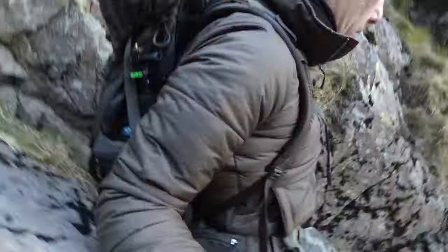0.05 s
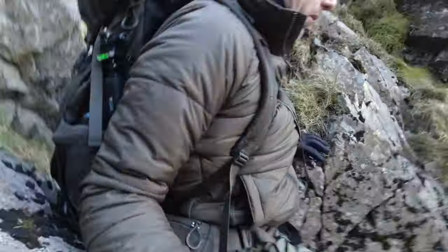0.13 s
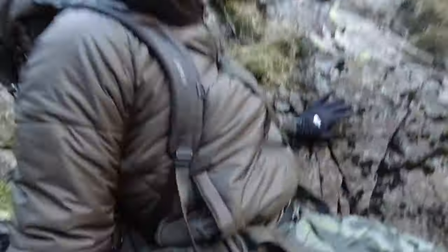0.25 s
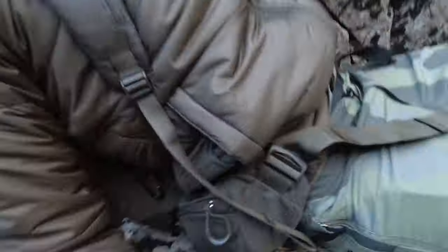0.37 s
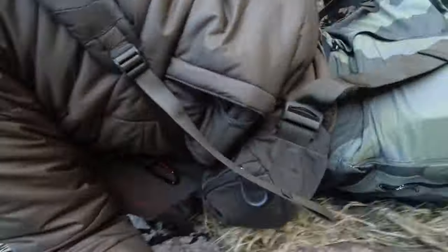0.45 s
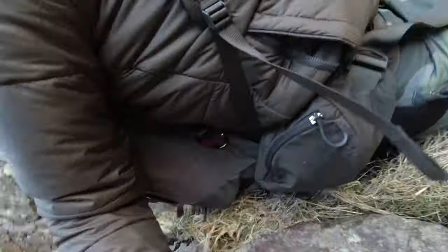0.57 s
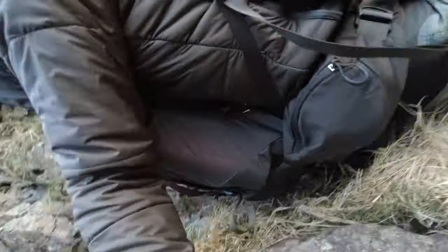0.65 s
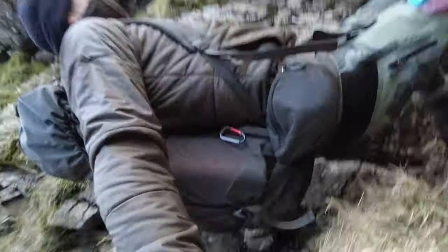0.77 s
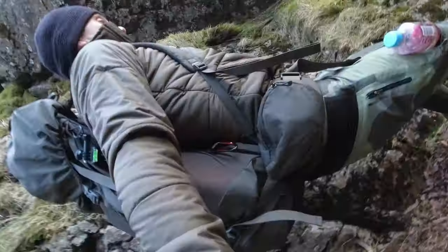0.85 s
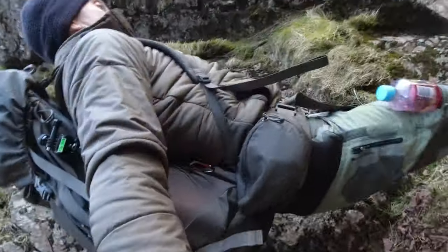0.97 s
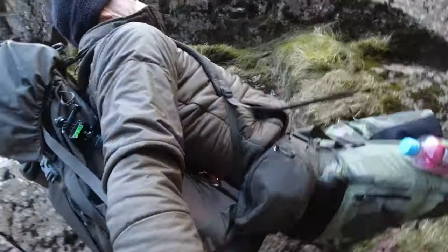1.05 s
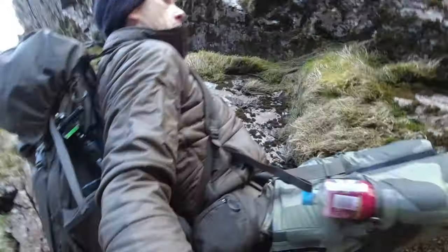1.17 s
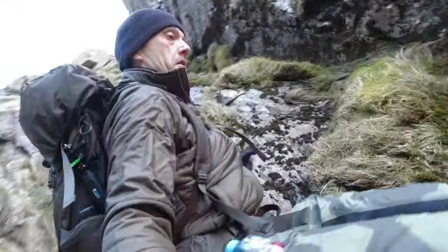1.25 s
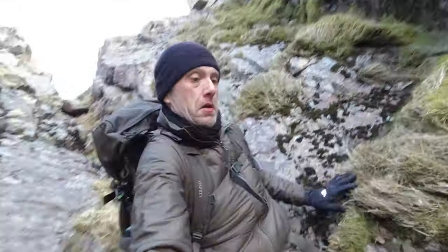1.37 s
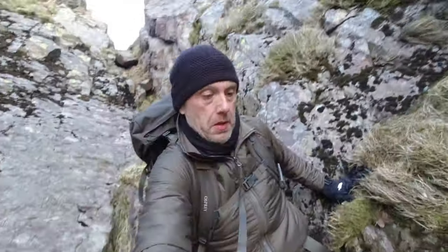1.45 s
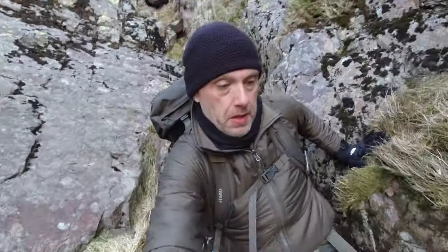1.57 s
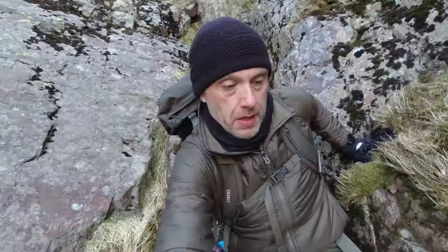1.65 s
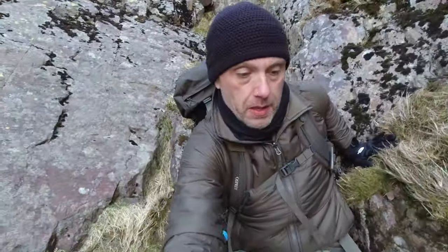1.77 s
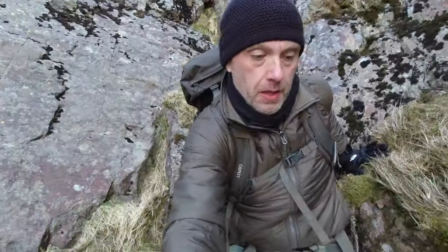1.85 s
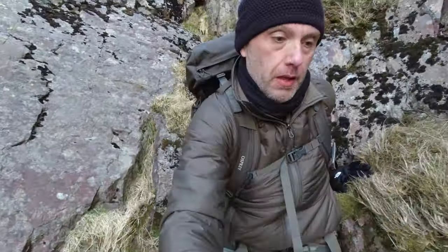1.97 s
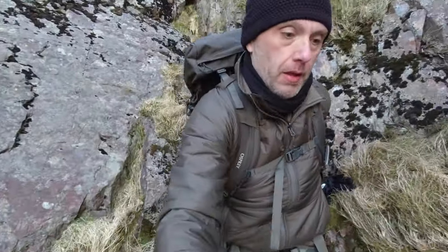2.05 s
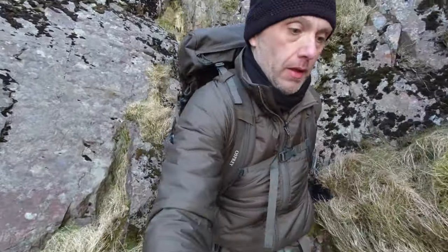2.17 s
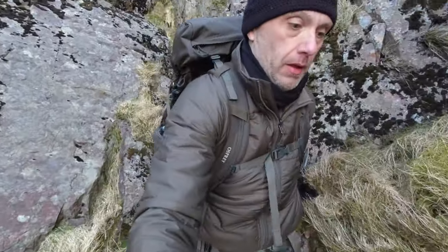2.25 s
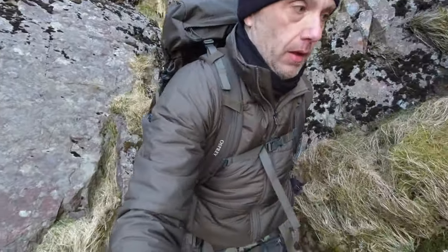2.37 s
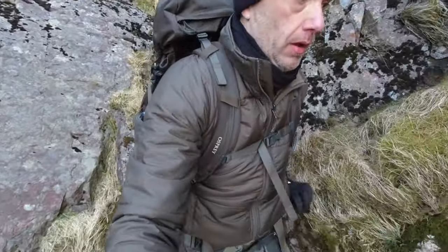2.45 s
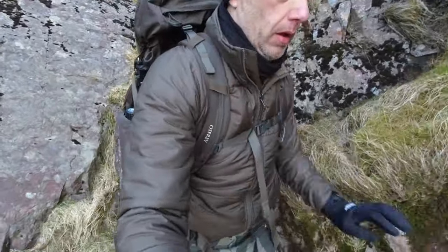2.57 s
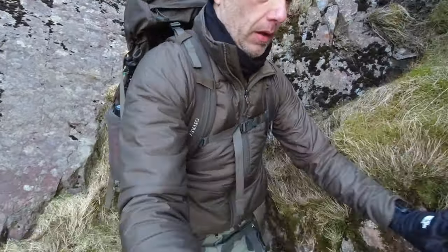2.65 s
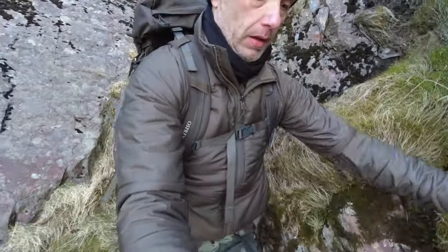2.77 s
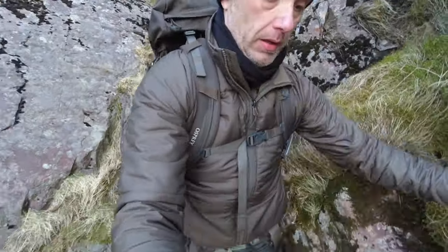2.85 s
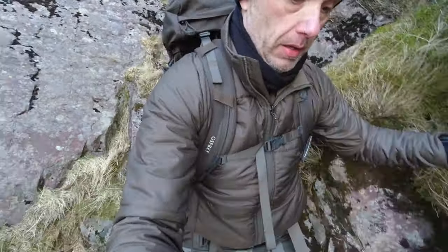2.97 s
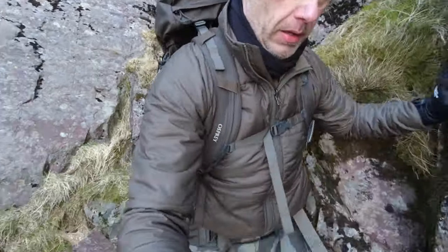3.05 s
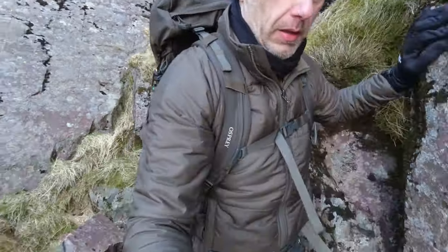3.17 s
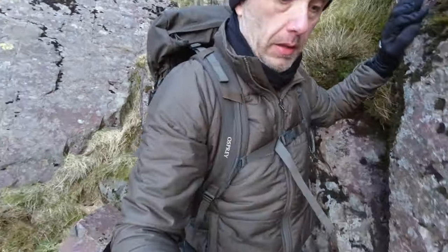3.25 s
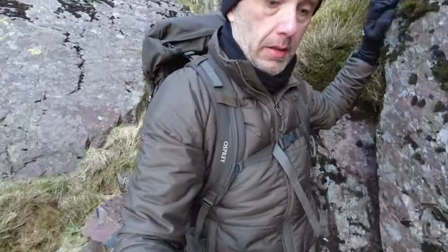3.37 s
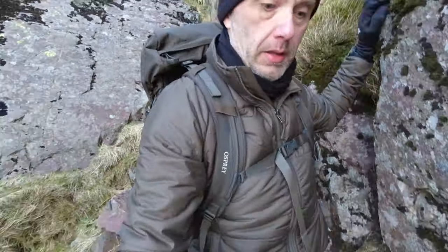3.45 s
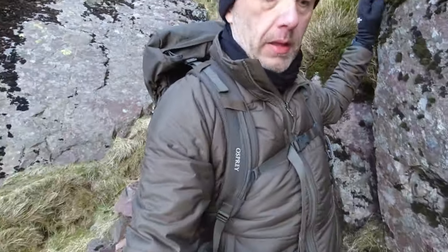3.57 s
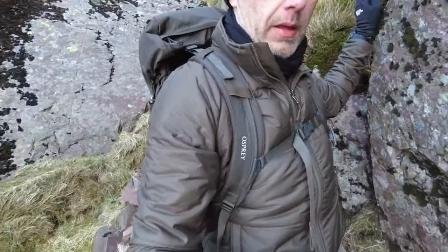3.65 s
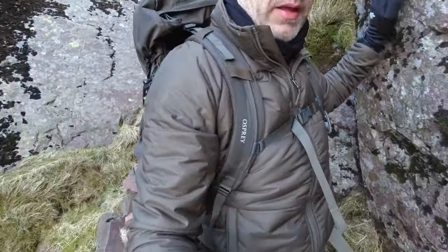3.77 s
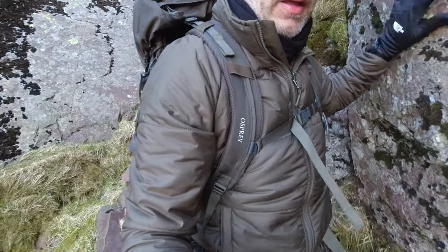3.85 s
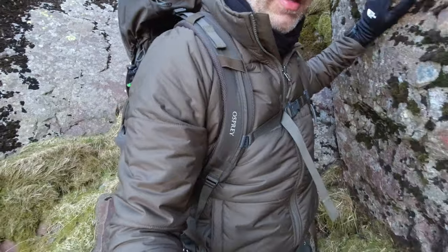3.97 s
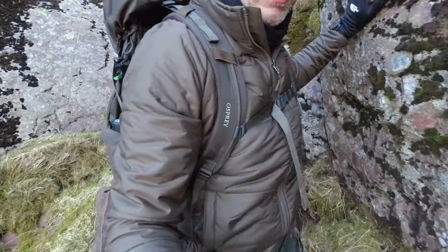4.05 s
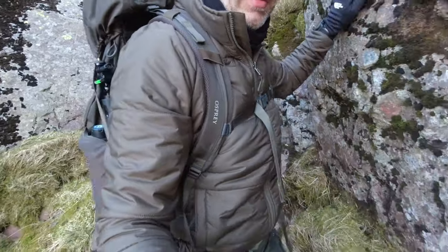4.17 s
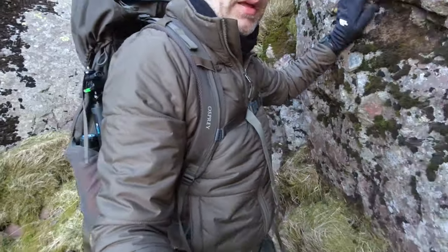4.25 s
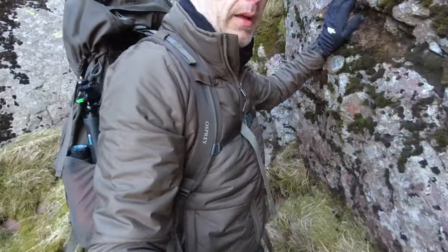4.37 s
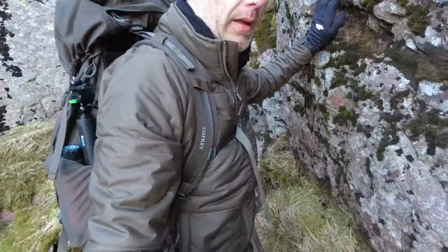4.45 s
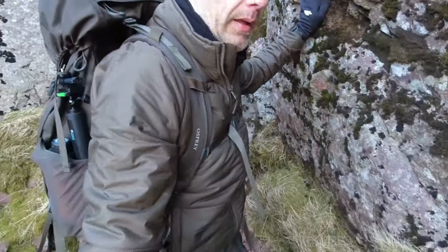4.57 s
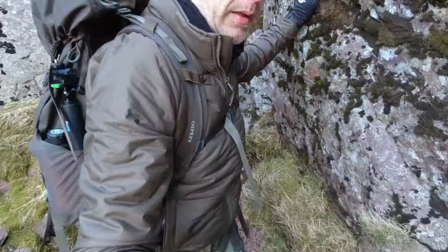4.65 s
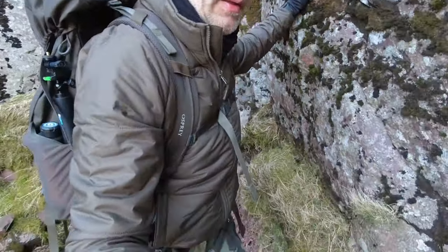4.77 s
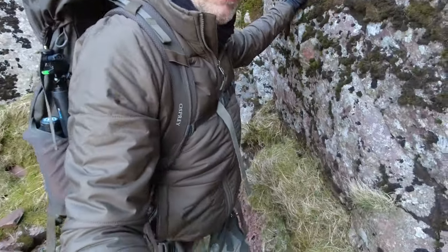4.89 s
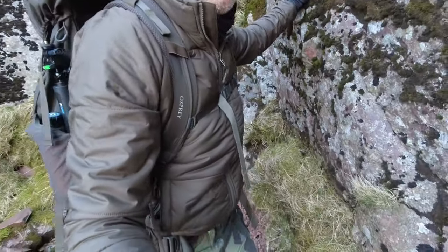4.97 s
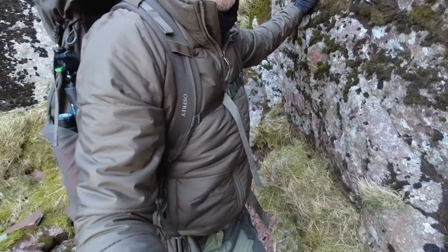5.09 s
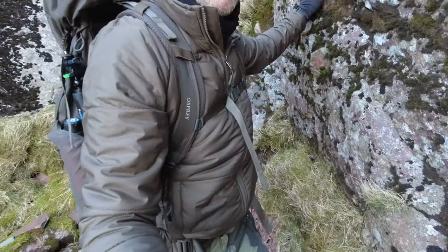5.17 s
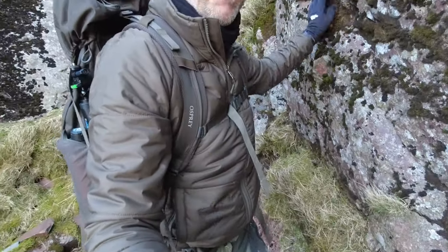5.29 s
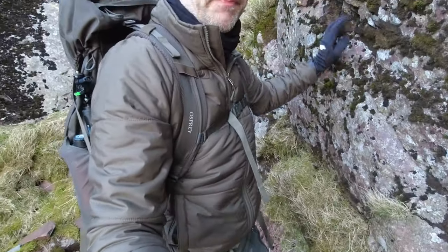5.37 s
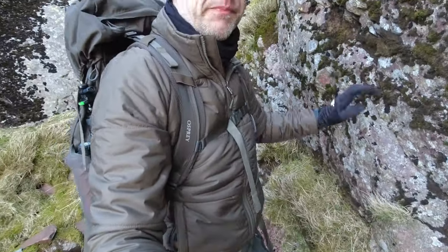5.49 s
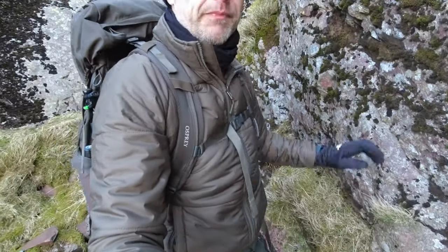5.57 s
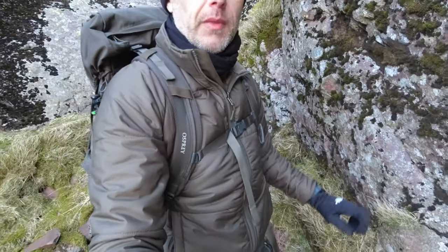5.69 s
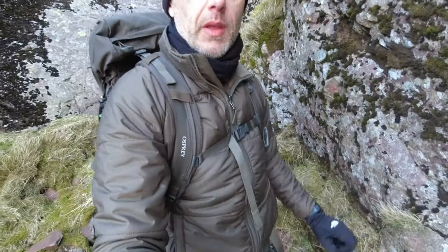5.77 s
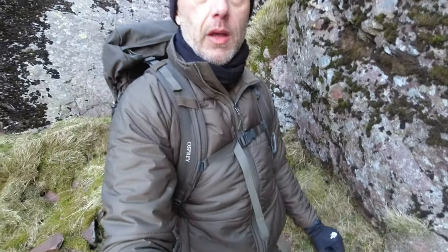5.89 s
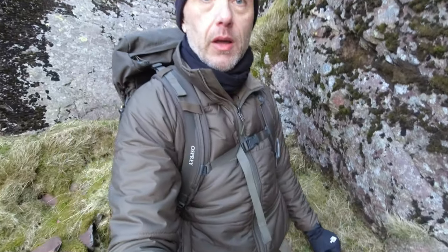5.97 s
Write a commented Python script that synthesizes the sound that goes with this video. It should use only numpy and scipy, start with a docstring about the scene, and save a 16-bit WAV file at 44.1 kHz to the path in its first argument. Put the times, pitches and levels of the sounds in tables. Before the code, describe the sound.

A sharp burst of stone knocks, gritty sliding and nylon rustle, a near-quiet pause, then renewed scraping, boot thuds and cloth swishes that fade.

```python
"""Loose stones knock, grind and clatter under a hiker who slides down a gully and shuffles to a stop.
The stones are ringing modes with noise cracks; sliding is noise chopped into many small contacts.
Boots and pack thud as low rings with noisy scuffs. The nylon jacket, close to the microphones, rustles
as ticking noise and snaps as short bursts. A small hand-held camera hears it all through two ports
in a resonant housing, modelled as a phase lag and a loss of likeness between them."""
import sys
import numpy as np
from scipy import signal
from scipy.fft import rfft, irfft, next_fast_len
from scipy.io import wavfile
from scipy.ndimage import uniform_filter1d

SR = 44100
rng = np.random.default_rng(int(sys.argv[2]) if len(sys.argv) > 2 else 0)


def dump_mix(stems):
    """Bounce the given channels to the path in sys.argv[1] as a 16-bit WAV at rate SR."""
    frames = np.atleast_2d(stems).T  # one column per channel
    limited = np.clip(frames, -1, 1)  # hard clip at full scale
    pcm = np.round(limited * 32767).astype(np.int16)
    wavfile.write(sys.argv[1], SR, pcm)


N = 265790

# The slide underfoot. Each row: time in seconds, deep grind of the body in dB, higher grind of boots in dB,
# clatter of stones in dB, grit in the clatter in dB.
SLIDE_LEVELS = [(0.0, -60, -70, -30, -38), (0.09, -50.5, -61, -47.5, -48), (0.3, -49.5, -53, -38, -53),
                (0.5, -51.5, -58, -39.5, -46.5), (0.57, -50, -47, -35, -53),
                (0.79, -47.5, -45.5, -41, -54.5), (0.92, -37, -38, -40, -45), (0.99, -56, -63, -52.5, -59),
                (1.08, -41, -37, -43.5, -51), (1.36, -49, -56.5, -45.5, -61),
                (1.56, -51.5, -47.5, -48, -57), (1.7, -45.5, -38, -45.5, -52),
                (1.81, -67.5, -61, -57, -55.5), (2.36, -65.5, -73, -63.5, -60),
                (2.46, -55, -61, -54.5, -55), (2.81, -61, -83, -65, -61.5), (2.85, -46, -50, -51.5, -50),
                (2.92, -49, -49.5, -48.5, -55), (3.06, -50, -56.5, -47, -59), (3.14, -30, -36, -36, -41),
                (3.2, -38, -41, -43.5, -45.5), (3.28, -35.5, -43, -41, -45), (3.55, -40, -52, -42, -42.5),
                (3.74, -48, -55, -49.5, -49), (3.82, -41.5, -48, -45.5, -45),
                (4.02, -56, -58, -51.5, -48.5), (4.3, -49.5, -54, -45, -48.5), (4.55, -45, -44, -46, -46),
                (4.62, -51, -46, -41.5, -39.5), (4.8, -45, -54, -41.5, -43),
                (4.92, -57.5, -53.5, -49.5, -39), (5.3, -54, -52.5, -45, -41),
                (5.62, -64.5, -74, -59, -47.5), (6.027, -68, -70, -63, -51.5)]
# Nylon close to the ports. Each row: time in seconds, rustle in dB.
RUSTLE_LEVELS = [(0.0, -67), (0.4, -64), (0.53, -56), (0.72, -65), (0.9, -39.5), (0.99, -52), (1.05, -40.5),
                 (1.23, -43), (1.265, -56), (1.29, -38), (1.4, -51.5), (1.75, -48), (2.3, -54),
                 (2.36, -58.5), (2.46, -50.5), (2.8, -62), (2.845, -58), (2.865, -52), (2.91, -63),
                 (3.06, -60.5), (3.13, -50), (3.42, -41.5), (3.88, -43), (3.98, -51), (4.07, -43.5),
                 (4.24, -47), (4.3, -52.5), (4.54, -53.5), (4.59, -42), (4.88, -48), (4.95, -38.5),
                 (5.42, -44.5), (5.85, -49.5), (6.027, -57.5)]
# Struck stones. Each row: start in seconds, blow in dB, stone pitch in Hz, overtone against it in dB,
# hardness (upper ring against the blow) in dB, centre of the upper ring in Hz, build-up in seconds,
# t60 of the pitch in seconds.
STONE_KNOCKS = [(0.014, -14.5, 684, 0.5, -8.5, 2400, 0.0015, 0.037),
                (0.042, -23, 880, -20, -12.5, 2300, 0.00086, 0.0081),
                (0.053, -9, 970, -16, -41, 1600, 0.0025, 0.014),
                (0.105, -19, 1020, -29, -38, 2300, 0.0028, 0.022),
                (0.206, -3.5, 898, -20, -6.5, 2500, 0.0064, 0.013),
                (0.222, -7.5, 1013, -25, -8, 2420, 0.0013, 0.031),
                (0.2411, -5.5, 610, 1, -26, 2300, 0.0013, 0.035),
                (0.418, -19.5, 630, -1, -13.5, 1620, 0.00478, 0.046),
                (0.516, -30, 910, -22, 15.5, 1810, 0.0046, 0.011),
                (0.537, -16.5, 910, -28, -18.5, 1700, 0.013, 0.03),
                (0.779, -25.5, 990, -15, -20, 2000, 0.0052, .08),
                (0.897, -27.5, 458, 1, -18, 2000, 0.0024, 0.032),
                (0.935, -14, 437, -25, -31, 2000, 0.0012, 0.023),
                (0.952, -19.5, 688, -0.5, -11, 2400, 0.00207, 0.033),
                (1.1, -25, 500, -4, -12, 2280, 0.0039, 0.012),
                (1.28, -15, 914, -27, -13, 1980, 0.0065, 0.017),
                (1.953, -48.5, 1020, -18, 9.5, 2160, 0.0016, 0.019),
                (2.568, -39, 696, -20, 3, 2100, 0.0016, 0.035),
                (3.043, -27.5, 980, -20, -16, 2050, 0.0019, 0.017),
                (3.99, -34, 1090, -26, 11.5, 1800, 0.002, 0.0069),
                (4.066, -29, 926, -14, -3, 2200, 0.002, 0.026),
                (4.196, -45.5, 710, -14, 15, 1800, 0.0013, 0.013),
                (4.351, -32.5, 855, -5, -36.5, 2000, 0.0024, .017),
                (4.916, -48, 826, -14, 17, 2100, 0.0015, 0.011),
                (4.949, -40, 815, -14, 13.5, 2350, 0.0051, .02),
                (5.136, -35.5, 900, -12, 8, 2400, 0.00077, .01),
                (5.152, -42, 570, -16, 16.5, 2450, 0.00093, .015),
                (5.378, -36, 910, -16, -20, 2000, 0.0028, .015),
                (5.482, -35.5, 990, -14, 2, 2400, 0.0016, .012),
                (5.702, -44.5, 606, -21, 3, 1700, 0.009, 0.15)]
# Boots and pack landing. Each row: start in seconds, weight in dB, pitch in Hz, t60 of the scuff in seconds.
LANDINGS = [(0.171, -29, 58, 0.89), (0.331, -23, 209, 0.11), (0.622, -32, 268, 0.08),
            (0.923, -27, 327, 0.1), (1.087, -28, 300, 0.2), (1.373, -27, 376, 0.025),
            (2.19, -49, 82, 0.081), (2.4155, -22, 324, 0.058), (2.417, -29.5, 62, 0.23),
            (2.496, -40.5, 100, 0.042), (2.78, -39, 226, 0.05), (2.8185, -30, 225, 0.065),
            (2.859, -29.5, 214, 0.1), (3.043, -26.5, 192, 0.036), (3.272, -25, 250, 0.094),
            (3.154, -25, 238, 0.084), (4.064, -30.5, 194, 0.28), (4.57, -25.5, 288, 0.072),
            (4.607, -28, 262, 0.12), (4.775, -27, 235, 0.083)]
# Cloth snaps. Each row: start in seconds, snap before colouring in dB, scratchy bottom against it in dB.
CLOTH_SNAPS = [(0.7522, -32, -11), (0.905, -12.5, -35), (0.912, -29, -24), (1.012, -29, -5),
               (1.034, -19, -24), (1.077, -21, -18), (1.138, -26, -23), (1.177, -34, 4), (1.188, -26, -1),
               (1.22, -13.5, -9.5), (1.296, -30, 5), (1.3206, -17, -11), (1.343, -23.5, 2.5),
               (1.3504, -20, -29), (1.441, -26, 2), (1.5277, -24, -12), (1.5384, -21, -7),
               (1.568, -26, -16), (1.6916, -24, -24), (1.747, -22, -6.5), (2.8588, -17.5, -29),
               (2.885, -22, -36), (2.939, -32, -10), (3.278, -22, -11), (3.31, -28, -27),
               (3.4485, -14.5, -8), (3.511, -27.5, 6.5), (3.818, -20, -15), (3.8717, -20, -27),
               (4.1604, -13, -14), (4.2263, -15, -33), (4.3867, -27.5, 3), (4.609, -27, 7.5),
               (4.671, -34.5, 8), (4.698, -15.5, -25), (4.8658, -21.5, -10), (4.9472, -25, -15)]
# Upper modes of struck stone. Each row: nominal pitch in Hz, level before the off-centre loss in dB,
# t60 in seconds.
STONE_MODES = [(1630, 3, 0.018), (1950, 0, 0.014), (2400, 3, 0.022), (2920, 0, 0.014), (4100, -2, 0.011)]
# Relative spectra of the sounds. Each row: frequency in Hz, gain in dB.
GRIND_COLOUR = [(50, -13.5), (100, -1), (150, -2.5), (220, -0.5), (300, -4.5), (500, -37)]
BOOTS_COLOUR = [(150, -38.5), (250, -6), (340, 0.5), (450, -5.5), (600, -22.5), (900, -67.5)]
RUMBLE_COLOUR = [(12, 5), (25, -11.5), (60, -2), (100, -4), (200, -34)]
CLATTER_COLOUR = [(250, -40), (450, -14), (620, -4), (700, -6), (800, -5), (940, -3), (1050, -3.5),
                  (1140, -10.5), (1250, -21.5), (1800, -61)]
GRIT_COLOUR = [(900, -35), (1300, -11), (1600, -4), (2050, 0), (2400, 1.5), (2800, -10), (3500, -9),
               (5000, -42.5)]
SCRATCH_COLOUR = [(2200, -14.5), (3400, -0.5), (4300, 2.5), (5300, 2), (6200, -0.5), (7000, -13),
                  (9000, -37.5)]
SWISH_COLOUR = [(5500, -18.5), (7200, -7.5), (8500, 0), (9600, 6.5), (10300, 7.5), (11400, 4.5),
                (12500, -10), (14000, -39)]
AIR_COLOUR = [(10000, -40), (11800, -3), (12800, 0), (14000, -2), (16500, -4)]
CRACK_COLOUR = [(1200, -5), (2500, 6.5), (4200, -9), (7000, -17), (10000, -15.5), (16000, -34)]
SCUFF_COLOUR = [(25, -26), (60, -9.5), (150, -3), (350, -8), (900, -18.5), (1300, -25), (2500, -50)]
# Drift of the rustle's colour. Each row: time in seconds, coarse scratch against the rustle in dB,
# fine air against it in dB.
RUSTLE_TINT = [(0.0, 4, -14), (0.6, -5.5, -2), (0.85, -5, 7), (1.12, -6.5, 2), (1.25, -4, -2.5),
               (2.0, -7, -4), (3.0, -5, -5), (3.2, -4, -0.5), (3.85, -8, -0.5), (4.1, -2, -4),
               (4.5, -5, -2), (4.7, -3, -2), (5.4, -5, -2.5), (6.027, 3, -4)]
# Low sounds spread wide while the body tumbles round the camera, then narrow.
# Each row: time in seconds, gain of the part unlike between the ports in dB.
LOW_SPREAD = [(0.0, 16), (0.7, 16), (0.8, 7), (1.42, 7), (1.52, -2), (6.027, -2)]
# Phase between the ports. Each row: frequency in Hz, lead of the left port in radians (negative lags).
PORT_LEAD = [(0, 0), (1050, -.3), (1720, -1.3), (3100, -3.2), (4480, -4.5), (5170, -6.2), (6550, -7.5),
             (7900, -9.9), (9300, -12.6), (11400, -14.4), (12750, -16.4), (16500, -23.5)]
# Likeness of the ports to equally strong common and unlike sound.
# Each row: frequency in Hz, likeness from 0 to 1.
PORT_LIKENESS = [(30, 0.3), (70, .97), (300, 0.993), (1050, 0.96), (1700, 0.76), (2400, 0.72), (3100, 0.86),
                 (4200, 0.5), (5600, 0.65), (7000, 0.44), (9500, 0.62), (12000, 0.45), (16000, 0.4)]

EDGE_HZ = 16250  # upper band limit
FULL_GRIND_DB = -40
RUMBLE_DB, RUMBLE_FOLLOWS = -55.5, 0.72  # rumble in the hand at full grind; dB per dB of grind
PEBBLE_HZ, PEBBLE_DB, PEBBLES_PER_S = (350, 2600), -6, 400  # pitch range; level against the clatter
PRICK_DB = -5  # sharp ticks against the rustle
SNAP_AIR_DB = -4  # gain into the top of a snap against its middle
OVERTONE, OFF_CENTRE_DB = 1.55, 17  # ratio to pitch; loss of upper modes per octave from the centre
CRACK_DB, CRACK_FOLLOWS = 2.5, 0.86  # harder blows crack louder: dB per dB of hardness
THUD_CYCLES, THUD_RISE_CYCLES = 9, 0.4  # cycles in which the push dies by 60 dB, and swells
SCUFF_DB = -5.5  # scuff against the weight, before colouring


def gain_of(db):
    """Decibels to a factor."""
    return 10 ** (np.asarray(db) / 20)


def evened(x):
    """Scales to rms 1."""
    return x / np.sqrt(np.mean(x ** 2) + 1e-20)


def read(points, hz):
    """A spectrum table read on a log-frequency axis."""
    f, value = np.transpose(points)
    return np.interp(np.log(hz + 1), np.log(f + 1), value)


def curves(table):
    """Every column of a curve table, sample by sample."""
    s, *columns = np.transpose(table)
    return [np.interp(np.arange(N) / SR, s, c) for c in columns]


def add(mix, s, sound):
    """Mixes a two-row sound in at a time in seconds."""
    part = mix[:, round(s * SR):][:, :sound.shape[1]]
    part += sound[:, :part.shape[1]]


def coloured(x, colour):
    """Causal minimum-phase filter with the given relative spectrum."""
    log_gain = np.log(gain_of(read(colour, abs(np.fft.fftfreq(8192, 1 / SR)))))
    taps = np.fft.ifft(np.exp(np.conj(signal.hilbert(log_gain)))).real[:2048]
    taps = taps / np.linalg.norm(taps)
    return signal.oaconvolve(x, taps[None], axes=1)[:, :x.shape[1]]


def impacts(per_s, spread_db):
    """Sparse contacts at random times, of random sizes."""
    size = gain_of(spread_db * np.minimum(rng.exponential(1, N), 4))
    return size * (rng.random(N) < per_s / SR)


def grains(per_s, spread_db, t60, bed):
    """Envelope of many small contacts: sudden start, quick decay, over an even bed."""
    fall = np.exp(-np.log(1000) / (t60 * SR))
    contacts = signal.lfilter([1], [1, -fall], impacts(per_s, spread_db))
    return evened(bed + evened(contacts))


def rubbed(level_db, colour, contacts, patchy_db):
    """Noise chopped into contacts, patchy in pitch, then coloured; row 1 is an unrelated twin."""
    z = signal.stft(contacts * rng.standard_normal((2, N)), nperseg=256)[2]
    patches = uniform_filter1d(rng.standard_normal(z.shape[1:]), size=5, axis=0)  # across pitch
    patches = uniform_filter1d(patches, size=8, axis=1)  # across time
    patchy = signal.istft(z * gain_of(patchy_db * evened(patches)), nperseg=256)[1][:, :N]
    return gain_of(level_db) * evened(coloured(patchy, colour))


def burst(t60, rise):
    """A short puff of noise that swells and dies, in two unrelated rows."""
    t = np.arange(9000) / SR
    return rng.standard_normal((2, 9000)) * (1 - np.exp(-t / rise)) * gain_of(-60 * t / t60)


def ring(hz, t60, rise):
    """A mode that swells to its peak, then dies; the twin row has a chance phase."""
    t = np.arange(6000) / SR
    shape = np.minimum(t / rise, 1) ** 2 * gain_of(-60 * np.maximum(t - rise, 0) / t60)
    phase_cycles = np.array([[0], [rng.random()]])
    return shape * np.sin(2 * np.pi * (hz * t + phase_cycles))


def slide(slips):
    """Grinding weight, rolling stones and their grit share some contacts; the hand feels the grind."""
    grind_db, boots_db, clatter_db, grit_db = curves(SLIDE_LEVELS)
    rumble_db = RUMBLE_DB + RUMBLE_FOLLOWS * (grind_db - FULL_GRIND_DB)
    stones = grains(per_s=350, spread_db=4, t60=0.016, bed=2.6)
    lurches = grains(per_s=45, spread_db=1.5, t60=0.043, bed=8)
    grind = rubbed(grind_db, GRIND_COLOUR, lurches * stones ** 0.3, patchy_db=3)
    boots = rubbed(boots_db, BOOTS_COLOUR, lurches ** 0.23 * stones ** 0.6, patchy_db=3.5)
    rumble = rubbed(rumble_db, RUMBLE_COLOUR, lurches, patchy_db=0.5)
    rolling = stones * lurches ** 0.18 * slips ** 0.4
    clatter = rubbed(clatter_db, CLATTER_COLOUR, rolling, patchy_db=3)
    low = grind + boots + rumble + clatter + pebbles(clatter_db + PEBBLE_DB)
    grit = rubbed(grit_db, GRIT_COLOUR, slips ** 0.3 * stones ** 0.7, patchy_db=2)
    return low, grit


def pebbles(level_db):
    """Small stones of many sizes tap one another at random, each with a short ring of its own."""
    size = impacts(PEBBLES_PER_S, spread_db=3.5)
    which = rng.integers(0, 24, N)
    taps = 0
    for k, hz in enumerate(np.geomspace(*PEBBLE_HZ, 24)):
        stone = ring(hz, 0.02, rise=0.0012)[:, :2000] * hz ** -0.3  # higher stones are softer
        taps = taps + signal.oaconvolve((size * (which == k))[None], stone, axes=1)
    return gain_of(level_db) * evened(taps[:, :N])


def jacket(slips):
    """Nylon folds slip in tiny ticks, some shared by all pitches; the largest folds snap and fizz briefly."""
    swish_db, = curves(RUSTLE_LEVELS)
    scratch_db, air_db = curves(RUSTLE_TINT)
    ticks, scuffs, fizz = (grains(per_s=400, spread_db=3.5, t60=0.004, bed=1.5) for _ in range(3))
    pricks = grains(per_s=260, spread_db=4, t60=0.002, bed=0)  # grit pricks the cloth
    pricks = pricks * slips ** 0.8 * rng.standard_normal((2, N))
    snaps = gain_of(swish_db + PRICK_DB) * evened(pricks)
    bottoms = gain_of(scratch_db) * snaps
    for s, db, bottom_db in CLOTH_SNAPS:
        snap = gain_of(db) * (burst(0.008, rise=0.0008) + 0.16 * burst(0.08, rise=0.003))
        add(snaps, s, snap)
        add(bottoms, s, gain_of(bottom_db) * snap)
    swish = rubbed(swish_db, SWISH_COLOUR, slips * ticks, patchy_db=2)
    scratch = rubbed(swish_db + scratch_db, SCRATCH_COLOUR, slips * scuffs, patchy_db=4)
    air = rubbed(swish_db + air_db, AIR_COLOUR, slips * fizz, patchy_db=5)
    middles = coloured(snaps, SWISH_COLOUR)
    tops = gain_of(SNAP_AIR_DB) * coloured(snaps, AIR_COLOUR)
    return swish + scratch + air + middles + tops + coloured(bottoms, SCRATCH_COLOUR)


def knocks():
    """Each blow rings the stone's body and the upper modes nearest its centre, with a sharp crack on top."""
    out, cracks = np.zeros((2, 2, N))
    for s, db, hz, over_db, hard_db, centre_hz, rise, t60 in STONE_KNOCKS:
        body = ring(hz, t60, rise) + gain_of(over_db) * ring(hz * OVERTONE, 0.7 * t60, rise)
        upper = 0
        for mode_hz, mode_db, mode_t60 in STONE_MODES:
            loss_db = OFF_CENTRE_DB * abs(np.log2(mode_hz / centre_hz))
            mode = ring(mode_hz * rng.uniform(0.98, 1.02), mode_t60, 0.8 * rise)
            upper = upper + gain_of(mode_db - loss_db) * mode
        add(out, s, gain_of(db) * (body + gain_of(hard_db) * upper))
        crack = burst(0.011, rise=0.0012) + 0.22 * burst(0.06, rise=0.002)
        crack_db = db + CRACK_DB + CRACK_FOLLOWS * hard_db
        add(cracks, s + 0.6 * rise, gain_of(crack_db) * crack)
    return out + coloured(cracks, CRACK_COLOUR)


def thuds():
    """Boots and pack land: a low push of a cycle or two, then a rough scuff of loose ground."""
    out, scuffs = np.zeros((2, 2, N))
    for s, db, hz, t60 in LANDINGS:
        push = ring(hz, THUD_CYCLES / hz, rise=THUD_RISE_CYCLES / hz)
        add(out, s, -gain_of(db) * push)
        add(scuffs, s, gain_of(db + SCUFF_DB) * burst(t60, rise=0.002))
    return out + coloured(scuffs, SCUFF_COLOUR)


def scene():
    """Row 0 is common to both ports, row 1 its unlike twin; close blows reach the ports less alike."""
    slips = grains(per_s=110, spread_db=3.5, t60=0.01, bed=2.2)  # cloth and grit slip together
    slips = slips * grains(per_s=22, spread_db=2.5, t60=0.17, bed=1.6)  # in uneven drags
    low, grit = slide(slips)
    spread = np.array([np.ones(N), gain_of(curves(LOW_SPREAD)[0])])
    return (low + thuds()) * spread + grit + jacket(slips) + knocks() * [[1], [1.4]]


def record(dry):
    """Two ports: the left lags and the housing makes them less alike in the treble; then the band limit."""
    size = next_fast_len(N + 1024)
    hz = np.fft.rfftfreq(size, 1 / SR)
    common, twin = rfft(dry, size)
    same = np.clip(read(PORT_LIKENESS, hz), 0, 1)
    lean = np.arccos(same) / 2  # each port leans away from the common sound, in opposite senses
    turn = np.exp(0.5j * np.interp(hz, *np.transpose(PORT_LEAD)))  # half the phase to each port
    left = (np.cos(lean) * common + np.sin(lean) * twin) * turn
    right = (np.cos(lean) * common - np.sin(lean) * twin) / turn
    ports = irfft(np.array([left, right]), size)[:, :N]
    ports = 0.9 * np.tanh(ports / 0.9)  # the loudest blows overload the input softly
    band_limit = signal.firwin(511, EDGE_HZ, window=("kaiser", 9), fs=SR)
    return signal.oaconvolve(ports, band_limit[None], "same")


dry = scene()
out = record(dry)
dump_mix(out)
```